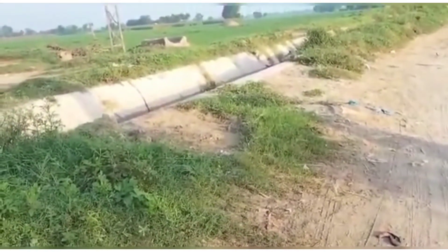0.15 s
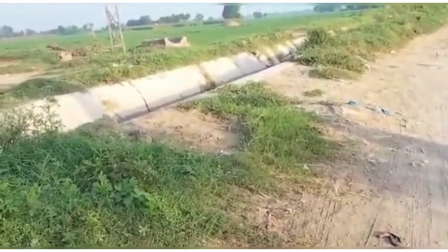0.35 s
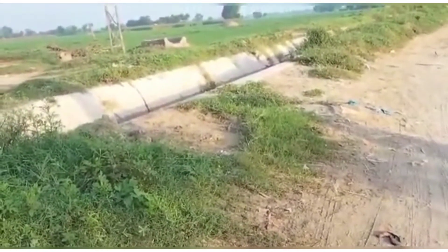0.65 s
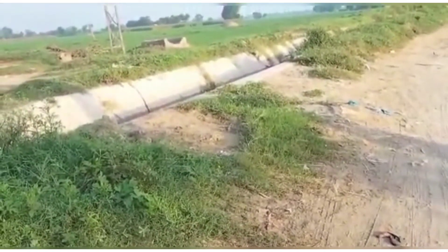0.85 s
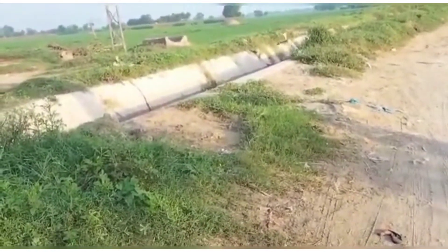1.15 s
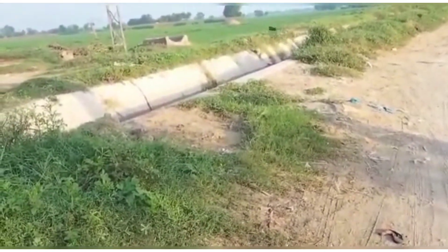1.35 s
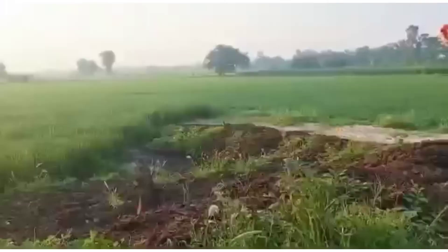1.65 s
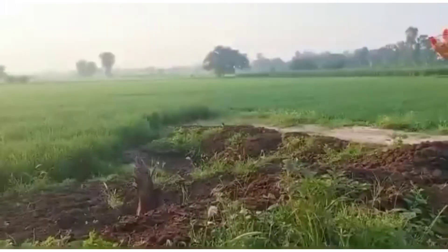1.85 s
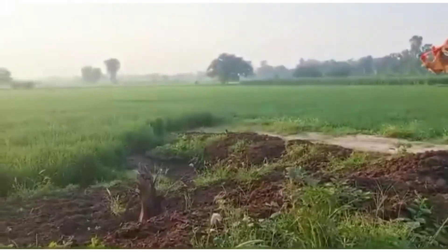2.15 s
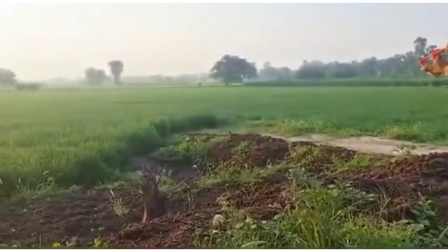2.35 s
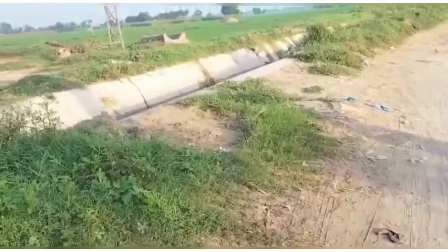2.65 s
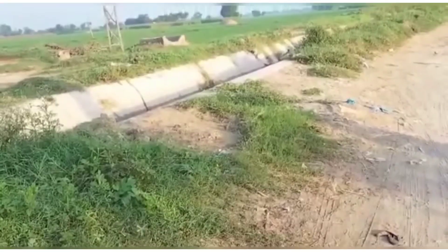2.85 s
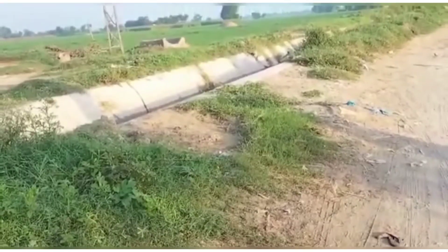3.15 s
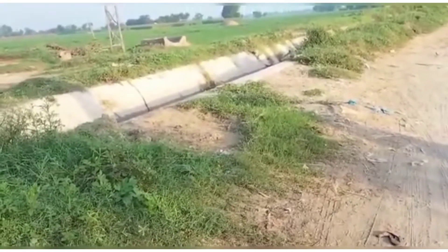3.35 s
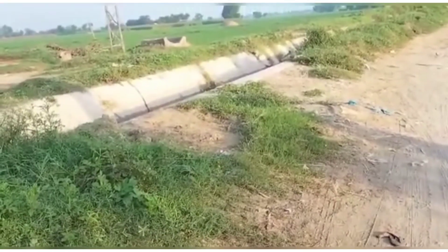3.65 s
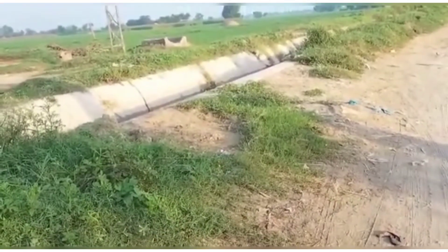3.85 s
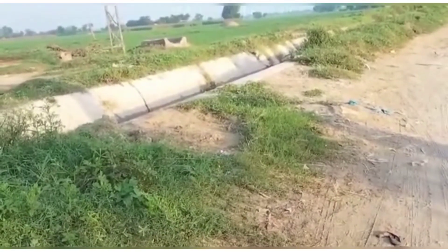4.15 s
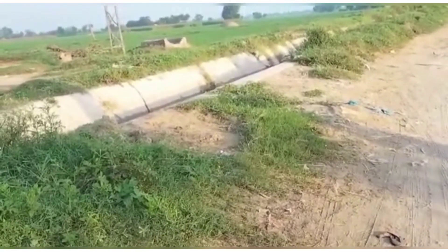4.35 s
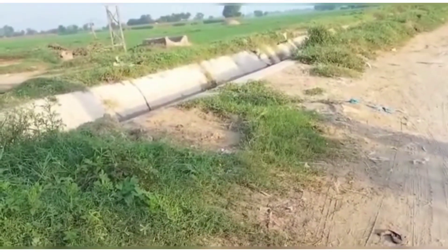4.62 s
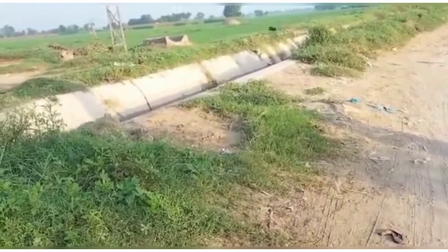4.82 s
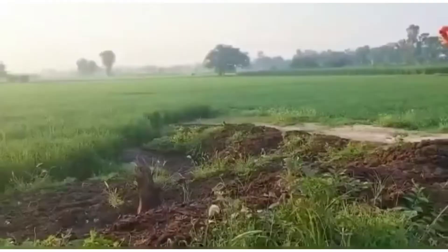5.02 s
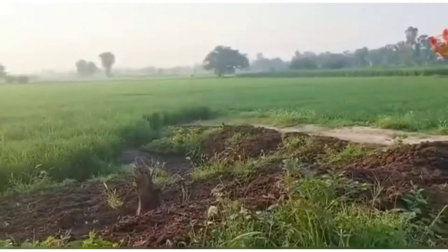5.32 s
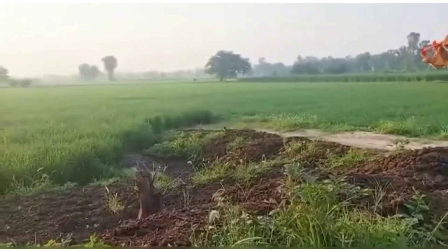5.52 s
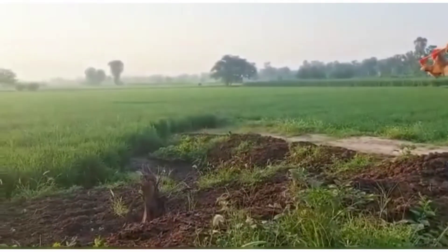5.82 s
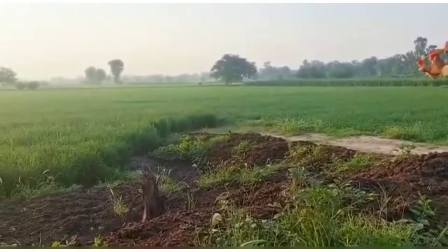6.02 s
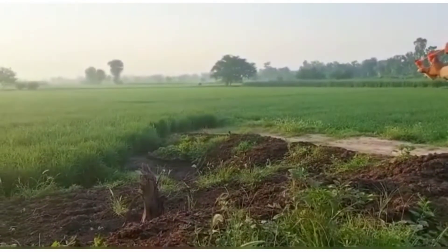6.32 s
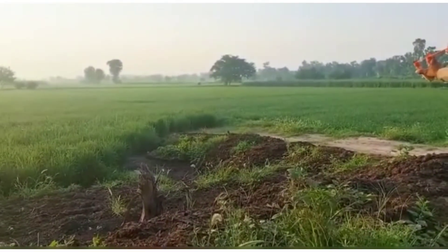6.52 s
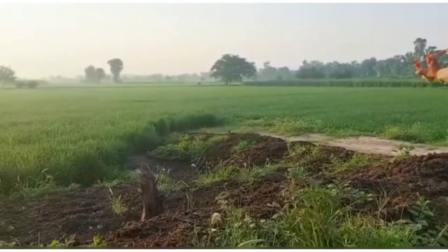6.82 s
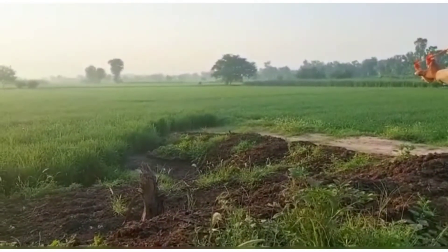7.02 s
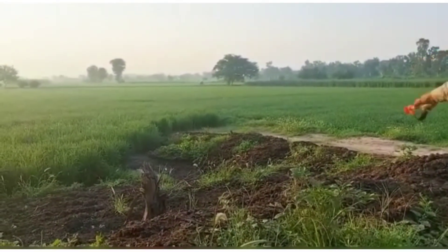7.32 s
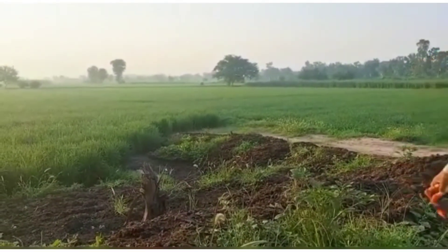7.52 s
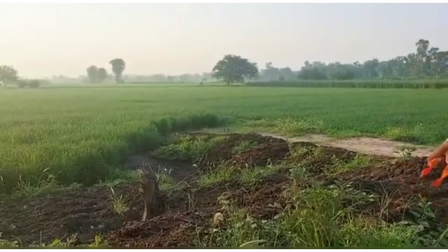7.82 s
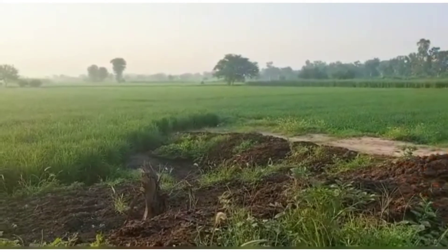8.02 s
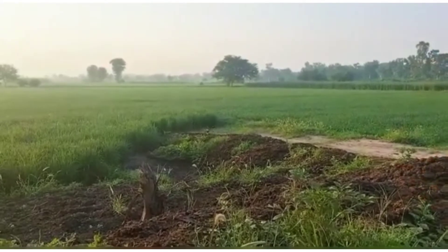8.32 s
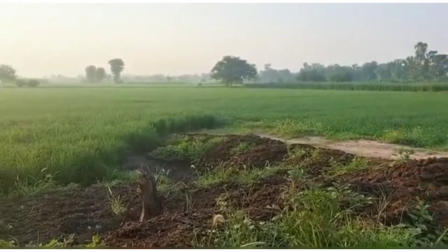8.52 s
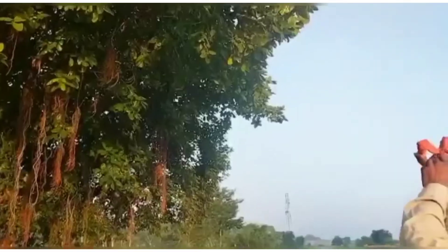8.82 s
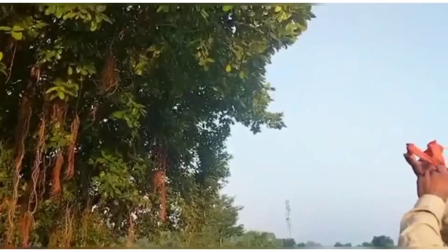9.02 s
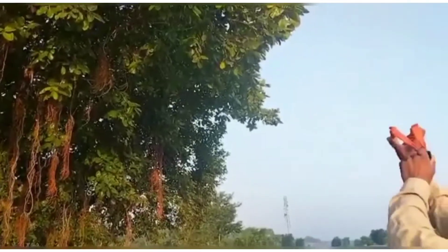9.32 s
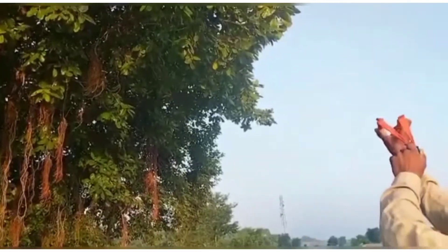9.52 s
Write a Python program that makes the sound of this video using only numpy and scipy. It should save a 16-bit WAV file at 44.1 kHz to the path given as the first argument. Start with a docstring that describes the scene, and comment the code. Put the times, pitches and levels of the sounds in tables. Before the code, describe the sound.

From 0 s, quiet ditch air, small bird whistles and a very faint, fast pump beat. At about 0.7 s a close slingshot release cracks: rapid pitched knocks, dull pouch thump and fluttering rubber, with smaller flaps and dry ticks until 1.5 s. At 1.6 s an abrupt cut to a nearby one-cylinder engine, about nine or ten metallic clanks and low chugs a second over roar, with chirring crickets. At 2.6 s it cuts back to the quiet ditch with light handling flaps, twittering and clear chirps. The same loud snap returns at 4.2 s. At 5.04 s the engine and crickets resume; a brighter, thinner snap lands at 6.7 s, with a rubbery flick at 6.9 s. Birds emerge over the engine from 7.3 s. At 8.04 s the engine vanishes, leaving soft air, faint hiss and quick repeating birdsong, slightly blurred by leaves, until about 9.6 s.

```python
"""A slingshot is let go in open farmland: rubber and pouch flutter as shaped noise, the band slaps the
frame in short pitched knocks over dull pouch thumps. It is heard in three places joined by cuts: a quiet
ditch with a far pump, a field beside a chugging one-cylinder engine with crickets, and a tree.
Birds are gliding sines with a noise blur behind them; engine, crickets and air are filtered noise and tones.
The stretch around the first shot is played once ahead as a teaser."""
import sys
import numpy as np
from scipy import signal
from scipy.fft import rfft, irfft, next_fast_len
from scipy.io import wavfile
from scipy.ndimage import uniform_filter1d

SR = 44100
rng = np.random.default_rng(int(sys.argv[2]) if len(sys.argv) > 2 else 0)


def inscribe(sig):
    """Save sig as 16-bit PCM at rate SR to the path in sys.argv[1].

    A 1-D sig is mono; a 2-D sig holds one channel per row.
    Samples are clipped to [-1, 1] before scaling.
    """
    pcm = np.round(np.clip(np.atleast_2d(sig).T, -1, 1) * 32767)
    wavfile.write(sys.argv[1], SR, pcm.astype(np.int16))


N = 426447

# Where the microphone stands: start of the ditch, of the engine field and of the tree, all in seconds.
DITCH_S, FIELD_S, TREE_S = (2.621, 5.043, 8.043)

# Single slaps of the band on the frame, close by. Each row: start in seconds, drive level in dB, pitch in Hz.
SLAPS = [(4.1685, -11.5, 3600), (4.1715, -4, 3030), (4.1774, -12, 3730), (4.1824, -9.5, 2520),
         (4.1954, -14, 3040), (4.1998, -10, 2600), (4.2036, -8.5, 3250), (4.2084, -12.5, 2520),
         (4.318, -26, 4140), (4.3545, -28.5, 3100), (6.712, -12, 2250), (6.712, -12, 3980),
         (6.712, -16, 6000), (6.7375, -10.5, 3750), (6.746, -18, 2320), (6.7532, -13, 3470),
         (6.7572, -12.5, 4280), (6.8803, -20, 5440)]
SLAP_CLICK_DB = -38.5  # the dry click, relative to its slap's drive level


def slaps():
    """A struck frame: each slap is a few cycles at its own pitch, with a dry click."""
    out = np.zeros(N)
    shape = puff(.0003, .0011)
    t = np.arange(len(shape)) / SR
    for s, db, hz in SLAPS:
        click = np.diff(rng.standard_normal(len(shape)), prepend=0) * shape ** 2
        add(out, s, gain_of(db + SLAP_CLICK_DB) * click)
        knock = steep(shape * np.sin(2 * np.pi * hz * t), hz, 2000)
        add(out, s, gain_of(db) * knock)
    return out


# Blows of the pouch, close by. Each row: start in seconds, envelope peak in dB, fall time in seconds.
THUMPS = [(4.168, -19, 0.0081), (4.196, -26, 0.012), (4.351, -30, 0.004), (4.391, -46, 0.0099)]
# Colour of those blows. Each row: frequency in Hz, relative level in dB per Hz.
POUCH_COLOUR = [(90, -26.5), (250, 4), (400, 0.5), (800, -9), (1400, 3), (2000, -4.5), (3000, -48)]


def pouch_thumps():
    """A soft pouch gives dull bursts of coloured noise with a quick rise and an exponential fall."""
    blows = np.zeros(N)
    for s, db, fall in THUMPS:
        add(blows, s, gain_of(db) * puff(0.0026, fall))
    return blows * colour(rng.standard_normal(N), POUCH_COLOUR)


# Small dry ticks near the microphone. Each row: start in seconds, drive level in dB.
TICKS = [(2.6564, -52), (2.707, -58), (4.4979, -45), (4.593, -50), (4.6573, -64), (4.6906, -60),
         (4.719, -64), (4.734, -63), (4.775, -71), (4.8985, -51), (4.958, -62), (4.985, -82), (4.91, -58.5),
         (4.9306, -56), (5.0397, -54.5), (5.056, -56.5), (6.7006, -40), (6.794, -46), (7.664, -52),
         (8.022, -48.5), (8.042, -46.5), (8.0644, -57)]


def ticks():
    """Tiny contacts: a bright click of noise mixed with a broad resonance."""
    out = np.zeros(N)
    shape = puff(0.00007, 0.0021)
    for s, db in TICKS:
        noise = rng.standard_normal(len(shape))
        edge = 0.21 * np.diff(noise, prepend=0)
        body = 22.0 * steep(noise, 4540, 1170)
        add(out, s, gain_of(db) * shape * (edge + body))
    return out


# Bursts of flapping rubber and pouch, and of hands on them, close by.
# Each row: start in seconds, length in seconds, level in dB at the start, level in dB at the end.
FLUTTERS = [(2.647, 0.033, -56.5, -58), (2.729, 0.034, -54, -50.5), (4.158, 0.0058, -43, -29),
            (4.165, 0.016, -22, -17.5), (4.193, .022, -23, -24), (4.227, 0.06, -39, -45.5),
            (4.296, 0.0617, -47.5, -24.5), (4.363, 0.045, -38, -37), (4.421, .03, -48, -44),
            (4.46, 0.055, -46, -43), (4.591, 0.038, -42, -60.5), (4.532, .05, -59, -56),
            (4.899, 0.046, -42.5, -59), (4.958, 0.102, -54, -65), (6.7064, 0.0046, -35, -16),
            (6.7123, 0.027, -21, -27), (6.738, 0.029, -22, -32), (6.768, 0.1, -38.5, -50.5),
            (6.85, 0.022, -46, -28), (6.876, 0.1, -27, -55.5)]
FLUTTER_RISE_S, FLUTTER_FALL_S = 0.00067, 0.0059
# Colour of the rubber, first up to a second into the field, then after it.
# Each row: frequency in Hz, relative level in dB per Hz.
BAND_COLOUR = [(290, -52), (500, -18), (880, -26), (1000, -13), (1530, -24.5), (2230, -6.5), (2810, -8),
               (3650, 4), (4210, 2.5), (6900, -23), (16000, -54)]
BAND_COLOUR_FIELD = [(530, -25.5), (900, -21.5), (1790, -16.5), (2170, -20), (3040, -14.5), (3680, -7.5),
                     (4800, -5.5), (5750, 2), (8760, -24), (16000, -49)]


def flutters():
    """Flapping gives clumped noise grains in the band's colour; each burst snaps on, drifts in level and dies."""
    level = np.zeros(N)
    for s, length, start_db, end_db in FLUTTERS:
        t = np.arange(round((length + 8 * FLUTTER_FALL_S) * SR)) / SR
        held = gain_of(start_db + (end_db - start_db) * np.minimum(t / length, 1))
        rise = np.minimum(t / FLUTTER_RISE_S, 1)
        fall = np.exp(-np.maximum(t - length, 0) / FLUTTER_FALL_S)
        add(level, s, held * rise * fall)
    grains = rng.standard_normal(N) * gain_of(2.3 * wobble(N, 0.00095))
    early = np.arange(N) < (FIELD_S + 1) * SR
    return level * np.where(early, colour(grains, BAND_COLOUR), colour(grains, BAND_COLOUR_FIELD))


def slingshot():
    """Flapping rubber, with slaps, pouch thumps and ticks thinned below 170 Hz."""
    thin = signal.butter(2, 170, "high", fs=SR, output="sos")
    return flutters() + signal.sosfilt(thin, slaps() + pouch_thumps() + ticks())


# Clanks of the valve gear beside the microphone, each ahead of its chug.
# Each row: start in seconds, peak in dB of the blow that shakes the casing.
CLANKS = [(5.085, -30), (5.196, -41), (5.311, -31), (5.42, -41.5), (5.54, -38.5), (5.683, -28.5),
          (5.809, -32), (5.915, -42), (6.027, -30), (6.137, -32), (6.235, -32.5), (6.334, -36.5),
          (6.427, -34.5), (6.532, -42), (6.638, -31), (6.744, -31), (6.848, -45), (6.959, -29.5),
          (7.066, -34), (7.165, -31), (7.26, -40), (7.366, -42), (7.476, -27.5), (7.587, -42),
          (7.699, -28.5), (7.805, -32), (7.9, -43), (8.014, -33.5)]
# Modes of the engine casing and pipe. Each row: frequency in Hz, width in Hz,
# relative level in dB before the scaling for width.
CASING = [(271, 39, -13), (355, 24, -4.5), (695, 23, -11), (1003, 13, -3.5), (1071, 97, -4.5),
          (1156, 45, -5.5), (1293, 77, -4), (2216, 30, -12), (2606, 260, -9.5), (3670, 220, -7),
          (5400, 990, -40)]
# Air by the engine. Each row: frequency in Hz, relative level in dB per Hz.
FIELD_AIR = [(25, -29), (55, -14), (114, 2.5), (212, -5), (350, -4.5), (575, -9.5), (677, -6.5), (840, -7),
             (988, -5), (1400, -7), (1900, -17.5), (3900, -14.5), (6200, -20.5), (7200, -31), (8100, -65),
             (16000, -64)]
FIELD_AIR_DB = -45.5
CHUG_LOWEST_START_HZ, CHUG_START_SPREAD_HZ, CHUG_CLIMB_HZ_PER_S = 69.3, 15, 1300
CHUG_LAG_S, CHUG_RISE_S, CHUG_FALL_S = .009, 0.0071, 0.058
CHUG_MEAN_DB, CHUG_DB_PER_CLANK_DB, CHUG_SPREAD_DB = -40.5, -0.13, 0.3  # a hard clank, a softer chug


def chugs():
    """Exhaust pulses: a low tone with a climbing pitch, and its octave below, after every clank."""
    out = np.zeros(N)
    t = np.arange(round(.1 * SR)) / SR
    shape = (1 - np.exp(-t / CHUG_RISE_S)) ** 2 * np.exp(-(t / CHUG_FALL_S) ** 2)
    mean_clank_db = np.mean(CLANKS, 0)[1]
    for s, clank_db in CLANKS:
        pitch_draw, phase, level_draw = rng.random(3)
        db = CHUG_MEAN_DB + CHUG_DB_PER_CLANK_DB * (clank_db - mean_clank_db)
        db += CHUG_SPREAD_DB * (2 * level_draw - 1)
        start_hz = CHUG_LOWEST_START_HZ + CHUG_START_SPREAD_HZ * pitch_draw
        turns = start_hz * t + CHUG_CLIMB_HZ_PER_S * t ** 2 / 2 + phase
        tone = np.sin(2 * np.pi * turns) + 0.41 * np.sin(np.pi * turns)
        add(out, s + CHUG_LAG_S, gain_of(db) * shape * tone)
    return out * gain_of(0.5 * wobble(N, 0.0063))


def clanks():
    """Rattling noise blows ring the fixed modes of the casing and its pipe."""
    blows = np.zeros(N)
    for s, db in CLANKS:
        add(blows, s, gain_of(db) * puff(0.00049, 0.011))
    blows += gain_of(-49 + 0.78 * wobble(N, 0.0033))  # loose parts never stop shaking
    rattle = blows * (2.65 * rng.standard_normal(N) + wobble(N, .0002))
    late = np.roll(rattle, round(0.0071 * SR))  # the low modes belong to the pipe, which answers later
    ring = np.zeros(N)
    for hz, width, db in CASING:
        drive = late if hz < 800 else rattle
        ring += gain_of(db) / np.sqrt(width / 50) * resonate(drive, hz, width)
    return gain_of(6.5) * signal.sosfilt(signal.butter(6, 6800, fs=SR, output="sos"), ring)


def engine():
    """A one-cylinder engine close by: clank, then chug, over a steady roar of coloured noise."""
    roar = colour(rng.standard_normal(N), FIELD_AIR) * gain_of(FIELD_AIR_DB + wobble(N, 0.036))
    return chugs() + clanks() + roar


# Single notes of other birds. Each row: start in seconds, length in seconds, start pitch in Hz,
# end pitch in Hz, level in dB at the end pitch.
NOTES = [(3.048, 0.11, 2890, 2754, -46), (3.345, 0.029, 2860, 2460, -54.5),
         (3.383, 0.061, 2170, 2095, -62.5), (3.707, 0.092, 2925, 2745, -49.5),
         (3.991, 0.052, 4540, 4200, -51), (4.085, 0.045, 4320, 4100, -50.5),
         (4.091, 0.027, 3030, 2860, -48.5), (4.643, 0.0726, 3240, 2930, -47),
         (4.654, 0.017, 4750, 4380, -44), (4.597, .03, 2500, 2900, -60), (4.67, .014, 4580, 3700, -47),
         (4.681, 0.021, 4180, 4140, -42), (4.712, 0.016, 4400, 4110, -47),
         (4.713, 0.054, 2888, 2673, -48.5), (4.746, 0.093, 3110, 3080, -42),
         (4.696, 0.02546, 3230, 4000, -49), (4.838, 0.09, 2440, 2320, -55),
         (5.012, 0.027, 3320, 4700, -50.5), (8.174, 0.034, 4960, 4830, -43), (8.33, .07, 4900, 4770, -60),
         (8.337, 0.037, 2919, 2555, -47), (8.678, .04, 4920, 5070, -55), (9.166, 0.044, 6260, 5100, -52),
         (9.196, 0.025, 5017, 5030, -52), (9.221, .047, 6300, 5400, -53), (9.342, 0.021, 4600, 3200, -33.5)]
# Songs, each a fixed run of notes. Each row: delay in seconds, length in seconds, start pitch in Hz,
# end pitch in Hz. Each row of its singings: time in seconds, then the level in dB of every note.
TREE_SONG = [(-.047, .032, 4950, 3800), (-.018, .014, 4850, 4550), (0, .032, 6250, 5330),
             (.036, .026, 4520, 4430), (.06, .03, 4740, 4760)]
TREE_SINGS = [(7.314, -63, -58, -39.5, -49, -49), (7.566, -48, -52, -37.5, -41, -56),
              (7.82, -64, -49, -41, -58, -41.5), (8.019, -65, -65, -56, -45.5, -47),
              (8.237, -37.5, -42, -39, -45, -41), (8.491, -38.5, -39.5, -34.5, -46, -41.5),
              (8.743, -45, -46, -40.5, -50, -51), (9.007, -49, -58, -47.5, -56, -56),
              (9.266, -48, -63, -41.5, -64, -35), (9.526, -51, -52, -41.5, -57, -48)]
STEP_SONG = [(0, .03, 3830, 3680), (.035, 0.018, 3370, 3246), (.056, 0.034, 2720, 2877),
             (.093, 0.024, 2890, 3030)]
STEP_SINGS = [(8.563, -60, -44.5, -42.5, -48), (8.812, -48, -45, -44.5, -54),
              (9.057, -48, -41.5, -49.5, -48), (9.322, -50, -39.5, -48, -48)]
DITCH_SONG = [(-.047, .022, 4200, 3630), (-.012, .022, 5300, 5100), (.008, .026, 5100, 4100),
              (.028, .032, 4080, 3990), (.062, .024, 4280, 4240), (.04, .03, 5150, 5050)]
DITCH_SINGS = [(2.696, -66, -55, -50, -48, -60, -60), (2.99, -55, -64, -56, -51, -48, -61),
               (3.291, -57, -65, -58, -52, -48, -66), (3.594, -50, -66, -62, -55, -47, -64),
               (3.894, -60, -63.5, -62.5, -58, -55.5, -64), (4.783, -56, -68, -64, -48.5, -47.5, -57)]
TWIN_CHIRP = [(-.012, 0.0311, 2723, 2353), (0, .034, 4190, 3220)]
TWIN_CHIRPS = [(3.11, -51.5, -44.5), (3.58, -40.5, -39), (3.685, -42, -37.5)]


def near_birds():
    """Nearer birds: single notes and repeated songs of gliding whistles."""
    near = np.zeros(N)
    for s, *row in NOTES:
        add(near, s, note(*row))
    songbook = ((TREE_SONG, TREE_SINGS), (STEP_SONG, STEP_SINGS),
                (DITCH_SONG, DITCH_SINGS), (TWIN_CHIRP, TWIN_CHIRPS))
    for song, sings in songbook:
        for s, *levels in sings:
            for (delay, *shape), db in zip(song, levels):
                add(near, s + delay, note(*shape, db))
    return near


# Far twitter. Each row: start in seconds, end in seconds, level in dB of the softest chirps, count of chirps.
TWITTER = [(2.63, 5.02, -64, 200), (3.53, 3.77, -58, 40), (3.95, 4.15, -59, 36), (4.58, 4.78, -57, 36),
           (8.05, 9.64, -60, 80)]


def far_birds():
    """Distant birds: short chirps at random times, pitches and levels, higher under the tree."""
    far = np.zeros(N)
    for start, end, db, count in TWITTER:
        lowest_hz = 2700 if start < TREE_S else 3800
        for when, pitch, length, loudness, glide in rng.random((count, 5)):
            hz = lowest_hz + 2200 * pitch
            chirp = note(.008 + .014 * length, hz * (.94 + .22 * glide), hz * (1.02 - .12 * glide),
                         db + 7 * loudness)
            add(far, start + (end - start) * when, chirp)
    return far


# Blur around the birds, first in the open ditch, then from the field on to the tree.
# Each row: decay to -60 dB in seconds, blur level in dB, direct sound of the far birds in dB.
SCATTER = [(.33, -8.5, -2), (.36, -2.5, -13)]
BLUR_HOLD = 1.5  # above 1 the blur lingers first and dies faster later


def birds():
    """Near songs over a far twitter; moving leaves scatter them into a smeared, decaying noise blur."""
    near, far = near_birds(), far_birds()
    t = np.arange(SR // 2) / SR
    heard = []
    for t60, blur_db, far_direct_db in SCATTER:
        decay = gain_of(-60 * (t / t60) ** BLUR_HOLD)
        blur = rng.standard_normal(len(t)) * decay * (t > .004)
        blur /= np.linalg.norm(blur)
        wet = gain_of(blur_db) * signal.oaconvolve(near + far, blur)[:N]
        heard.append(near + gain_of(far_direct_db) * far + wet * (.9 + .4 * wobble(N, .001)))
    return np.where(np.arange(N) < FIELD_S * SR, *heard)


BEND, SWELL_DB_PER_OCTAVE = 1.7, 22  # sweeps fall fast, then level out, growing louder as they drop


def note(length, start_hz, end_hz, db):
    """A gliding sine with a slight waver and a faint overtone; short notes are the rougher ones."""
    n = round(length * SR)
    glide = end_hz + (start_hz - end_hz) * np.linspace(1, 0, n) ** BEND
    waver = 1 + .00045 / length * wobble(n, .002)
    angle = 2 * np.pi * np.cumsum(glide * waver) / SR
    level_db = db - SWELL_DB_PER_OCTAVE * np.log2(glide / end_hz) + 1.1 * wobble(n, 0.0093)
    tone = np.sin(angle) + 0.0024 * np.sin(2 * angle)
    return gain_of(level_db) * signal.windows.tukey(n, .6) * tone


# Cricket bouts in the field, a high and a low chorus. Each row: start in seconds, length in seconds, level in dB.
HIGH_BOUTS = [(5.028, 0.35, -51), (5.504, 0.28, -49), (5.786, 0.24, -51), (6.08, 0.28, -49.5),
              (6.41, 0.236, -51.5), (7.185, 0.35, -48.5), (7.82, 0.27, -52.5)]
LOW_BOUTS = [(5.09, 0.22, -57.5), (5.9, 0.11, -54.5), (6.1, 0.22, -52.5), (7.31, .1, -55),
             (7.5, 0.11, -50.5)]
BOUT_RISE_S, BOUT_FALL_S = .09, .04


def crickets():
    """Two choruses of narrow noise that throbs at an unsteady rate, and a thin high line."""
    t = np.arange(N) / SR
    line = evened(steep(rng.standard_normal(N), 8760, 160))
    out = gain_of(-89 + 2.5 * wobble(N, .05)) * line * (t < 6.55)
    # pitch in Hz, width in Hz, throbs per second, throb depth, bouts
    choruses = ((5400, 360, 66, .25, HIGH_BOUTS), (4570, 160, 41, .95, LOW_BOUTS))
    for hz, width, rate, depth, rows in choruses:
        turns = np.cumsum(rate * (1 + 0.55 * wobble(N, 0.0314))) / SR
        throb = 1 + depth * np.sin(2 * np.pi * turns)
        chirr = evened(throb ** 2 * steep(rng.standard_normal(N), hz, width))
        out += bouts(rows) * gain_of(0.83 * wobble(N, 0.038)) * chirr
    return out


def bouts(rows):
    """Level that swells in, holds and fades out for each bout."""
    t = np.arange(N) / SR
    level = np.zeros(N)
    for s, length, db in rows:
        ramp = np.minimum((t - s) / BOUT_RISE_S, (s + length - t) / BOUT_FALL_S)
        level += gain_of(db) * np.clip(ramp + .5, 0, 1) ** 2
    return level


# The far pump: level of its thump and of its tick, both in dB.
PUMP_THUMP_DB, PUMP_TICK_DB = (-63, -75)
# Its beat: first beat in seconds, beats per second.
PUMP_FIRST_S, PUMP_BEATS_PER_S = (2.83, 11.3)


def pump():
    """A far pump: low noise thumps and higher noise ticks, both dying after each steady beat."""
    beats = (np.arange(N) / SR - PUMP_FIRST_S) * PUMP_BEATS_PER_S
    since_beat = beats % 1 / PUMP_BEATS_PER_S  # seconds
    thump_level = uniform_filter1d(np.exp(-since_beat / .025), 400)
    thump = evened(steep(rng.standard_normal(N) * thump_level, 112, 160))
    tick_level = uniform_filter1d(np.exp(-since_beat / .005), 60)
    tick = evened(steep(steep(rng.standard_normal(N) * tick_level, 2000, 2500), 2000, 2500))
    return gain_of(PUMP_THUMP_DB) * thump + gain_of(PUMP_TICK_DB) * tick


# Quiet air in the ditch. Each row: frequency in Hz, relative level in dB per Hz.
DITCH_AIR = [(25, -41), (92, -7), (330, -17), (480, -32), (1130, -25), (1700, -29.5), (2760, -28),
             (4200, -36), (5300, -36.5), (6000, -49), (16000, -69)]
DITCH_AIR_DB = -62.5


def ditch():
    """Quiet air as gently flickering coloured noise, with the pump far off."""
    air = colour(rng.standard_normal(N), DITCH_AIR) * gain_of(DITCH_AIR_DB + 0.44 * wobble(N, 0.016))
    return air + pump()


# Soft air under the tree. Each row: frequency in Hz, relative level in dB per Hz.
TREE_AIR = [(15, -42), (25, -12), (114, 0.5), (263, -13), (545, -14), (1160, -7.5), (2000, -17),
            (5730, -21.5), (6380, -25), (7310, -32), (8360, -53), (16000, -49)]
TREE_AIR_DB = -53
# Far hiss bands under the tree. Each row: frequency in Hz, width in Hz, level in dB once swelled in.
TREE_HISS = [(7090, 320, -70), (1149, 250, -56), (4800, 32, -82), (9900, 150, -99)]
HISS_START_DB, HISS_SWELL_S = -8, 0.51  # the bands start this far down and come up over this time


def tree():
    """Soft coloured-noise air with narrow bands of far insect and traffic hiss that swell in."""
    out = colour(rng.standard_normal(N), TREE_AIR) * gain_of(TREE_AIR_DB + 1.2 * wobble(N, .06))
    swell_db = HISS_START_DB * np.clip(1 - (np.arange(N) / SR - TREE_S) / HISS_SWELL_S, 0, 1)
    for hz, width, db in TREE_HISS:
        flicker_db = 0.83 * wobble(N, 0.017) + 1.0 * wobble(N, 0.28)
        out += gain_of(db + swell_db + flicker_db) * evened(steep(rng.standard_normal(N), hz, width))
    return out


def gain_of(db):
    """dB to gain."""
    return 10 ** (np.asarray(db) / 20)


def evened(x):
    """Scales to rms 1."""
    return x / np.sqrt(np.mean(x ** 2) + 1e-20)


def colour(x, points):
    """Filters by a spectrum given as (Hz, dB) points; rms 1."""
    size = next_fast_len(len(x))
    f, db = np.transpose(points)
    hz = np.fft.rfftfreq(size, 1 / SR)
    curve_db = np.interp(np.log(hz + 1), np.log(f + 1), db)
    return evened(irfft(rfft(x, size) * gain_of(curve_db), size)[:len(x)])


def resonate(x, hz, width):
    """A fixed resonance of gain 1."""
    r = np.exp(-np.pi * width / SR)
    return 2 * signal.lfilter([1 - r], [1, -r * np.exp(2j * np.pi * hz / SR)], x).real


def steep(x, hz, width):
    """A resonance applied twice: steeper skirts."""
    return resonate(resonate(x, hz, width), hz, width)


def add(mix, s, sound):
    """Mixes a sound in at s seconds."""
    part = mix[round(s * SR):][:len(sound)]
    part += sound[:len(part)]


def wobble(n, seconds):
    """Smooth random signal of rms 1 that changes over the given time."""
    size = max(round(seconds * SR), 1)
    return evened(uniform_filter1d(uniform_filter1d(rng.standard_normal(n), size), size))


def puff(rise, fall):
    """Envelope of peak 1 with a quick rise and an exponential fall (s)."""
    t = np.arange(round(7 * fall * SR) + 50) / SR
    shape = (1 - np.exp(-t / rise)) * np.exp(-t / fall)
    return shape / shape.max()


TEASER_FROM_S = 3.459  # the opening plays the stretch from here


def scene():
    """Cuts between the three places, then puts the teaser in front."""
    t = np.arange(N) / SR
    in_field = np.clip((t - FIELD_S) / 0.015, 0, 1) * np.clip((TREE_S - t) / 0.0059, 0, 1)
    quiet_places = np.where(t < FIELD_S + .012, ditch(), tree())
    background = quiet_places * (1 - in_field) + (engine() + crickets()) * in_field
    mix = slingshot() + birds() + background
    lead = round(DITCH_S * SR)
    teaser = mix[round(TEASER_FROM_S * SR):][:lead]
    return np.concatenate([teaser, mix[lead:]])[None]


def record(dry):
    """The microphone drops the deepest bass; the loudest peaks are gently rounded; then the treble is cut off."""
    x = signal.sosfilt(signal.butter(2, 42, "high", fs=SR, output="sos"), dry)
    x = 1.4 * np.tanh(x / 1.4)
    treble_cut = signal.firwin(511, 15900, window=("kaiser", 9), fs=SR)
    return signal.oaconvolve(x, treble_cut[None], "same")


dry = scene()
out = record(dry)
inscribe(out)
```